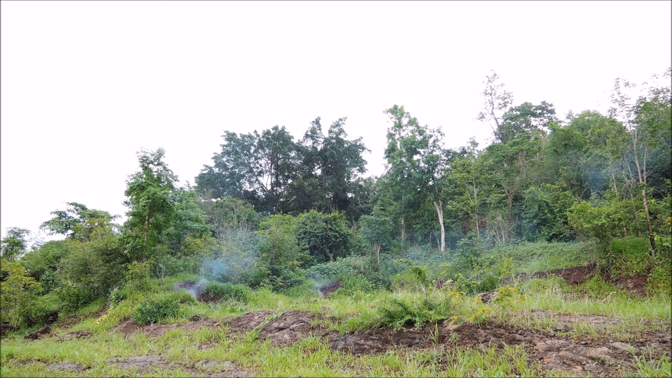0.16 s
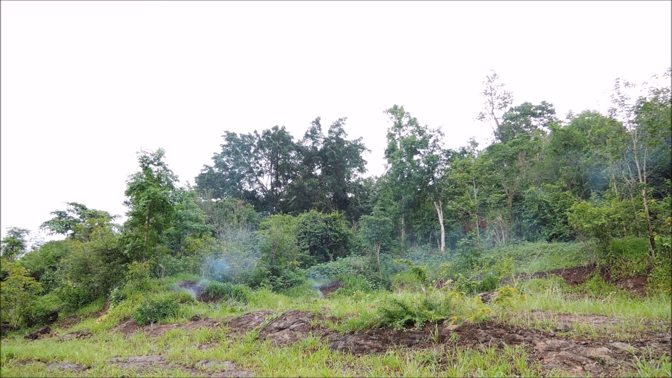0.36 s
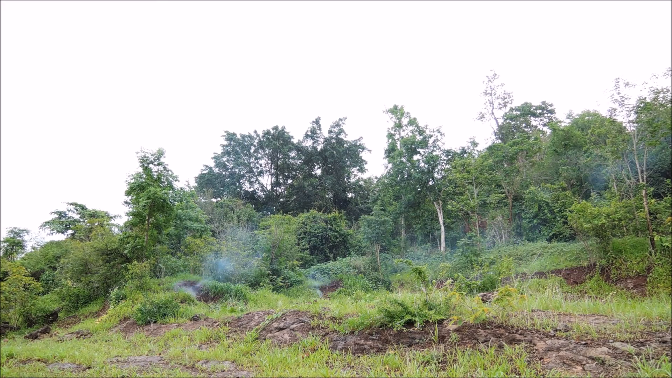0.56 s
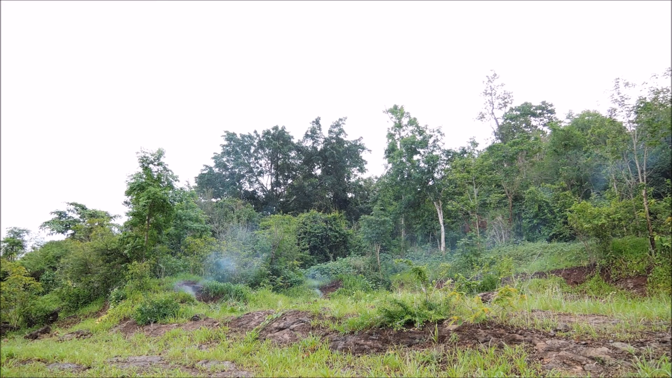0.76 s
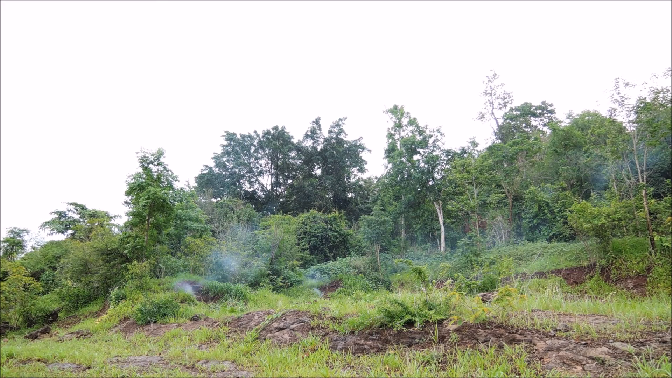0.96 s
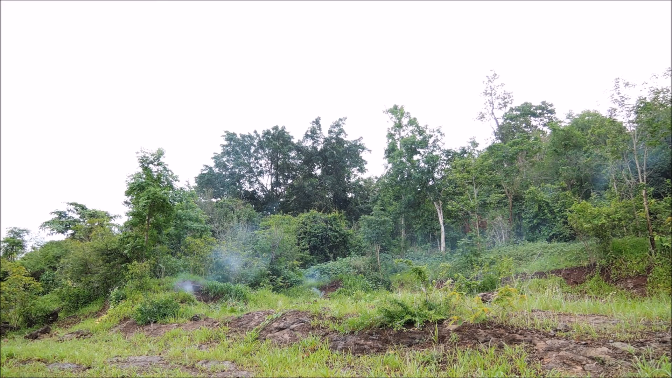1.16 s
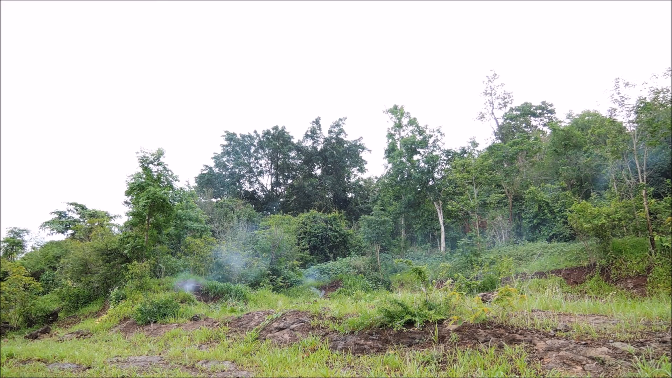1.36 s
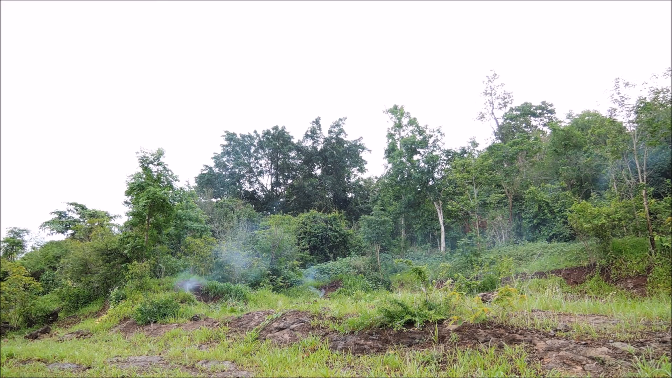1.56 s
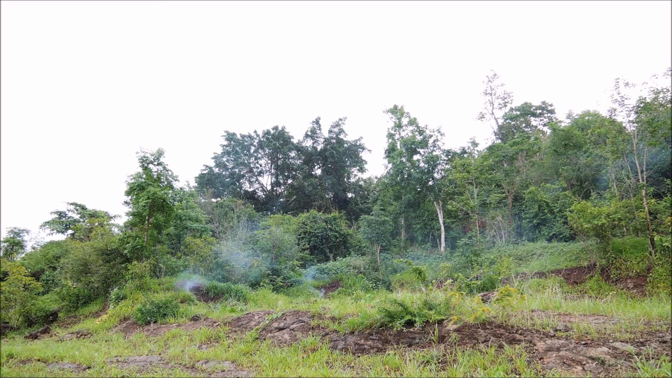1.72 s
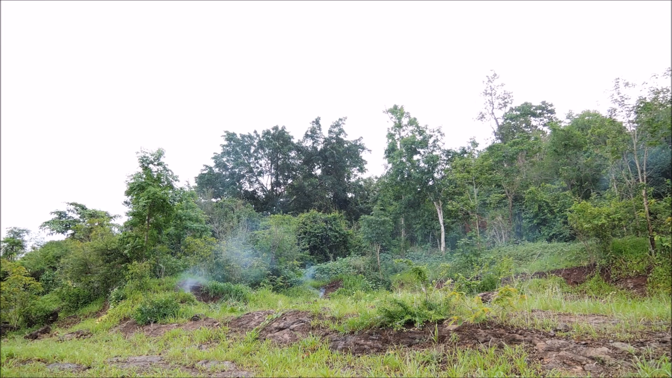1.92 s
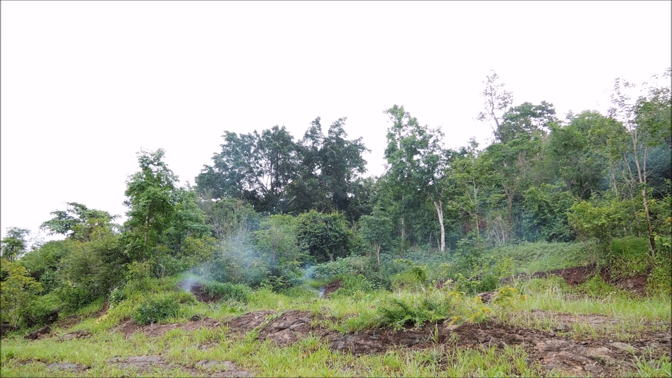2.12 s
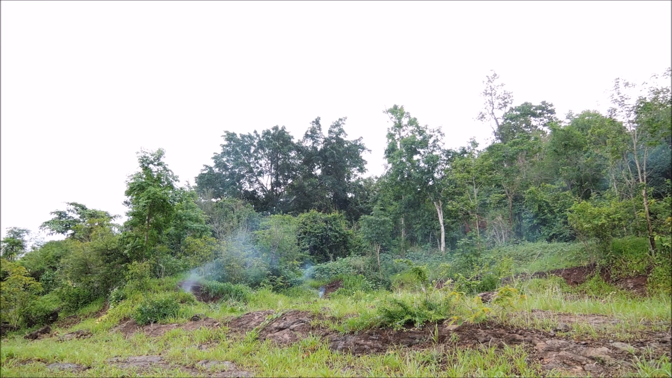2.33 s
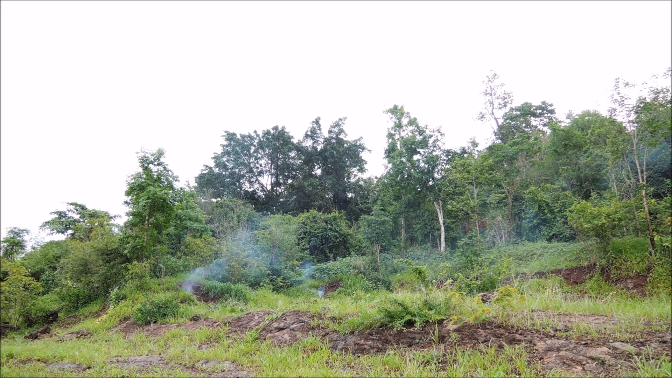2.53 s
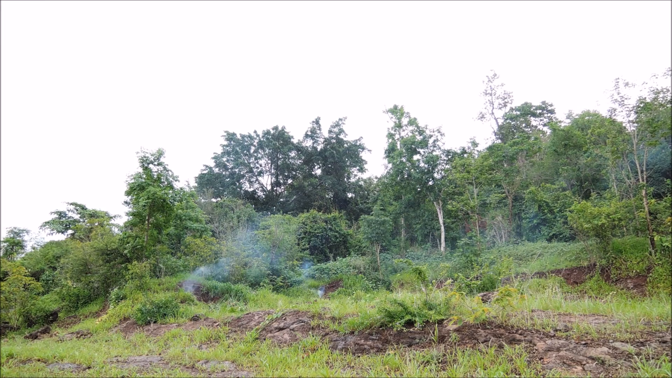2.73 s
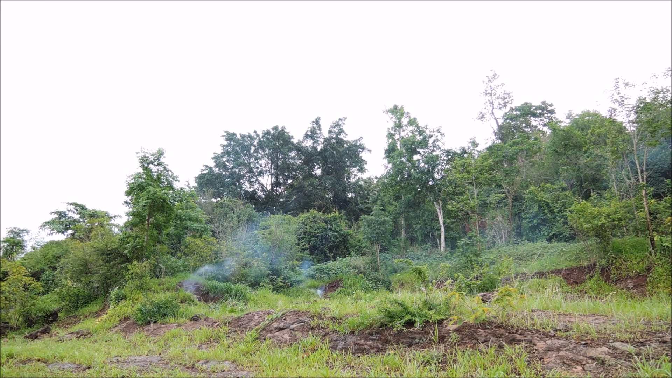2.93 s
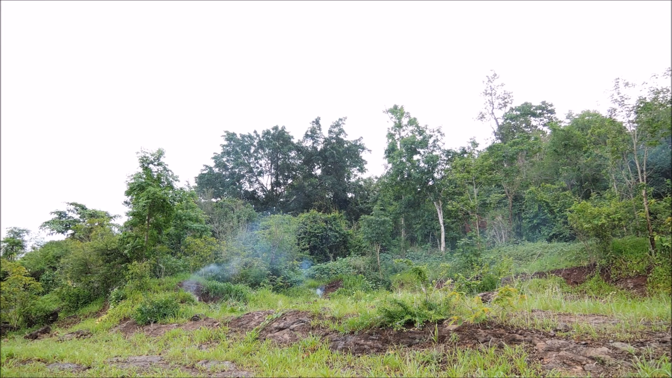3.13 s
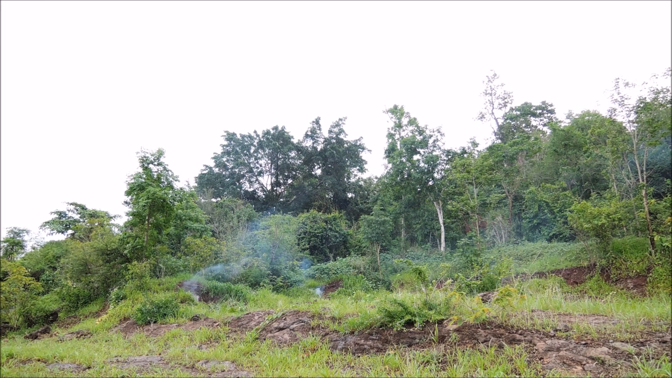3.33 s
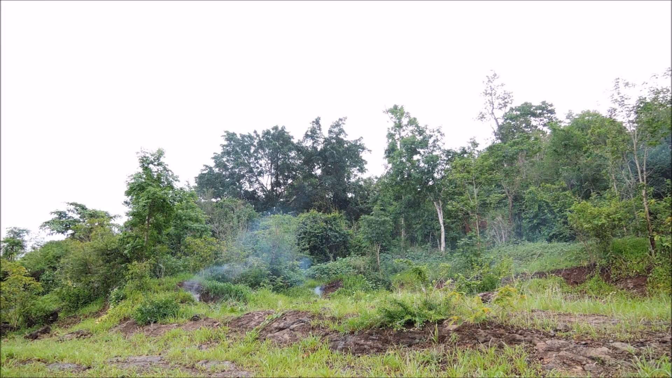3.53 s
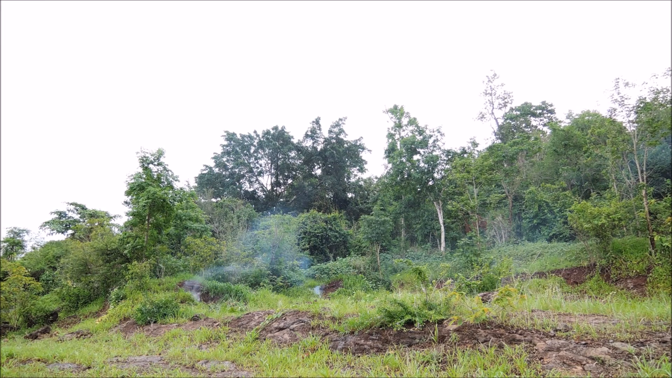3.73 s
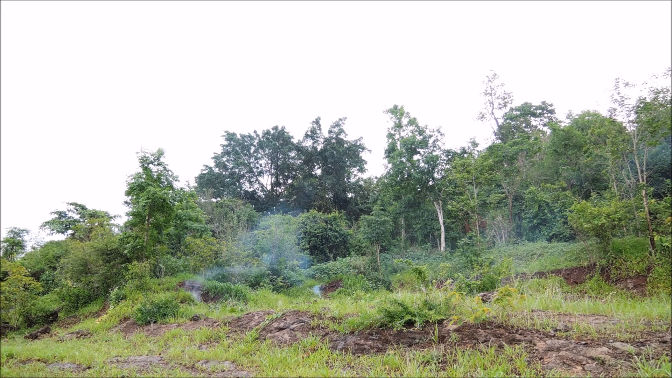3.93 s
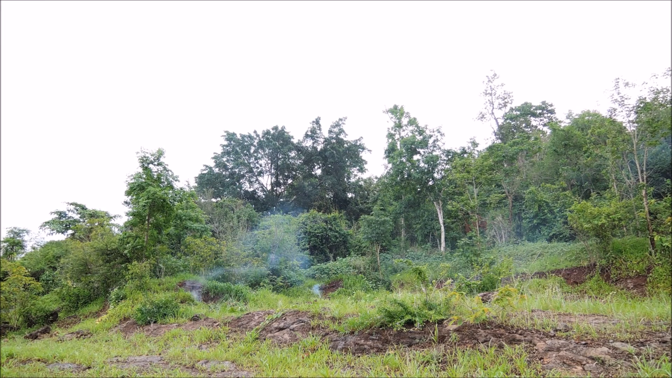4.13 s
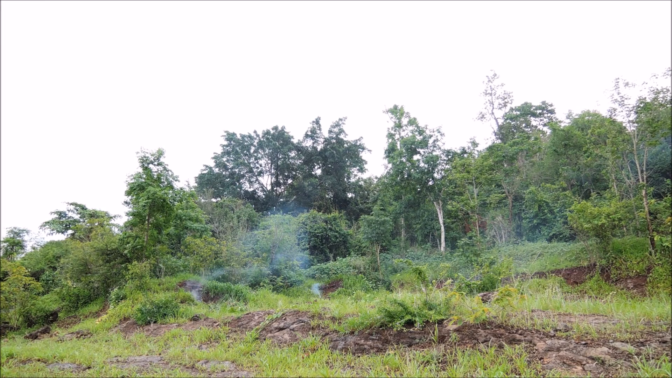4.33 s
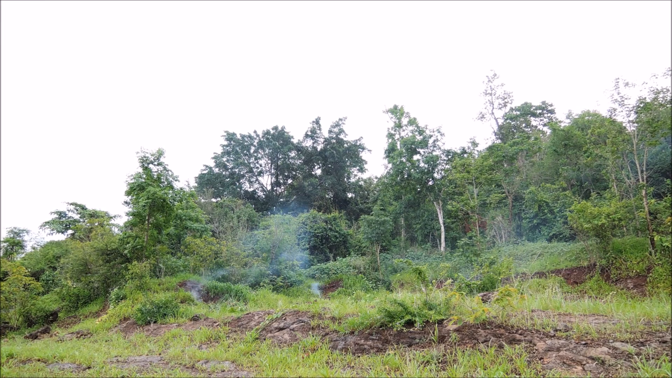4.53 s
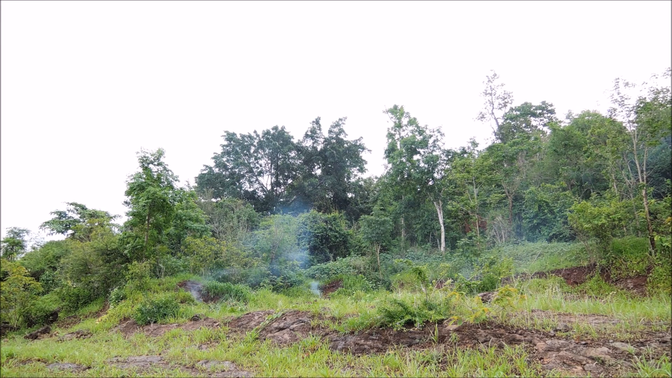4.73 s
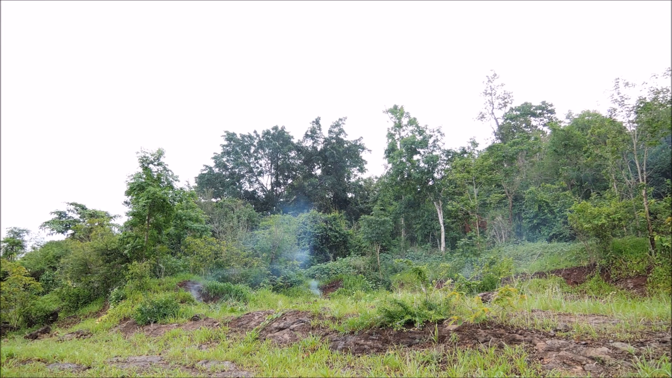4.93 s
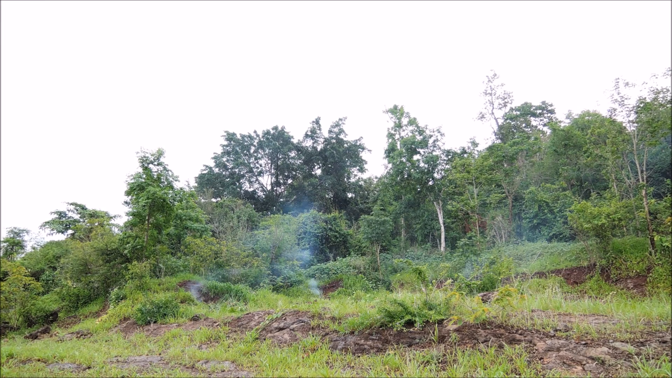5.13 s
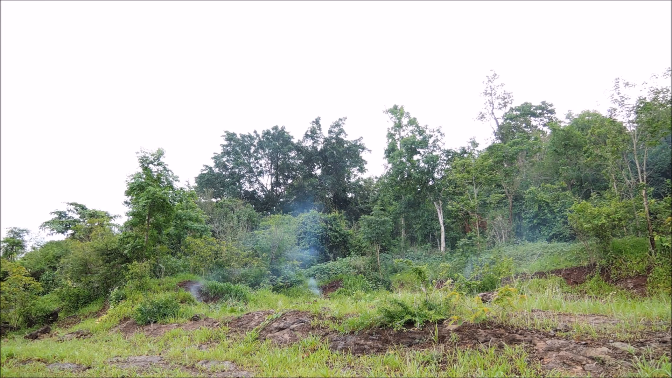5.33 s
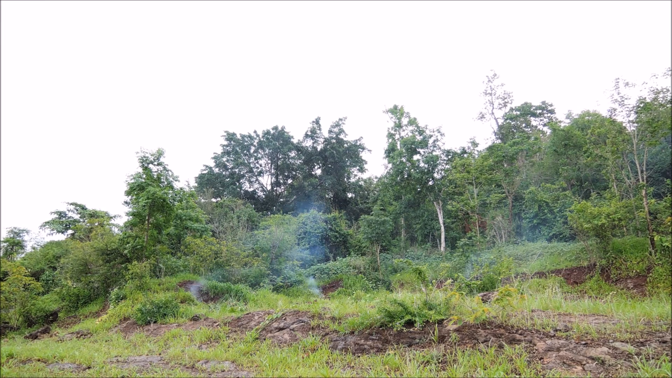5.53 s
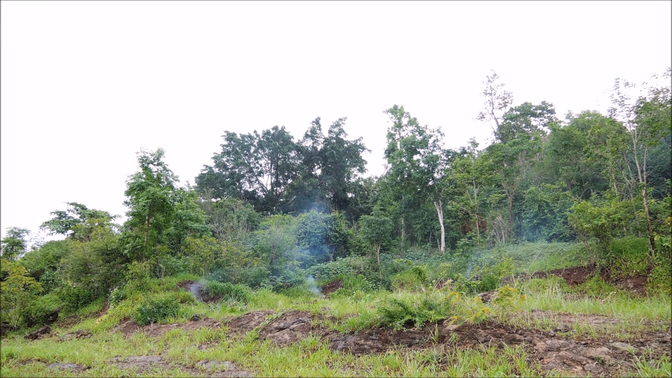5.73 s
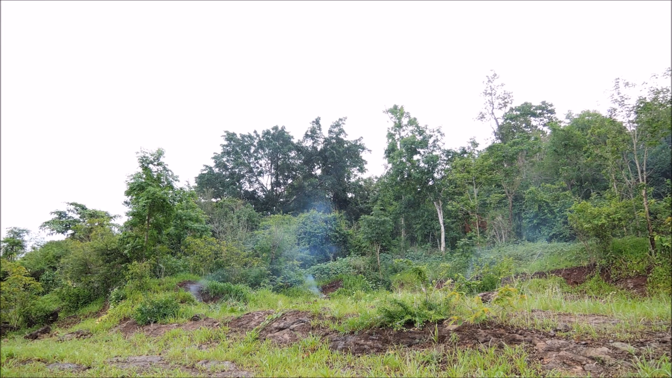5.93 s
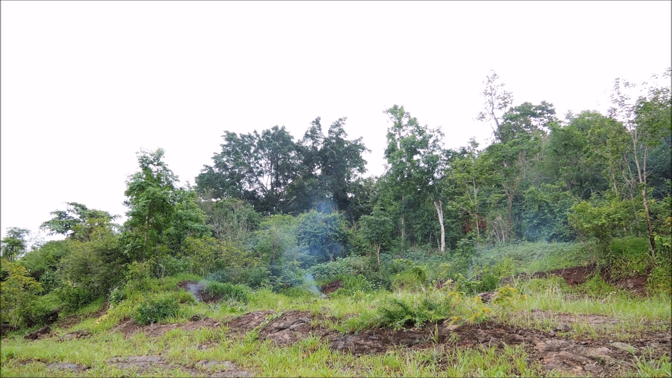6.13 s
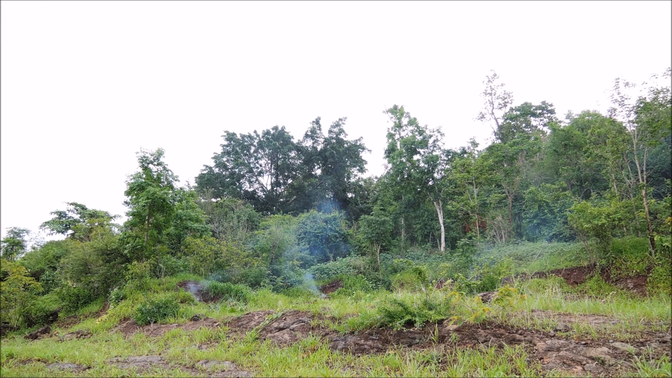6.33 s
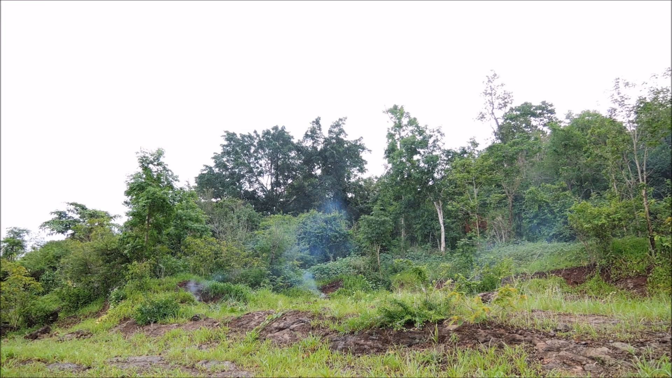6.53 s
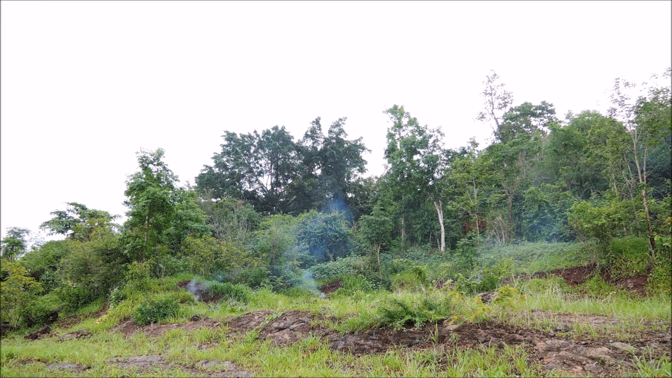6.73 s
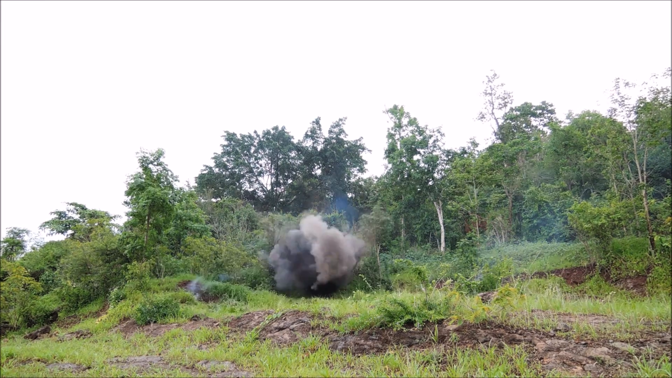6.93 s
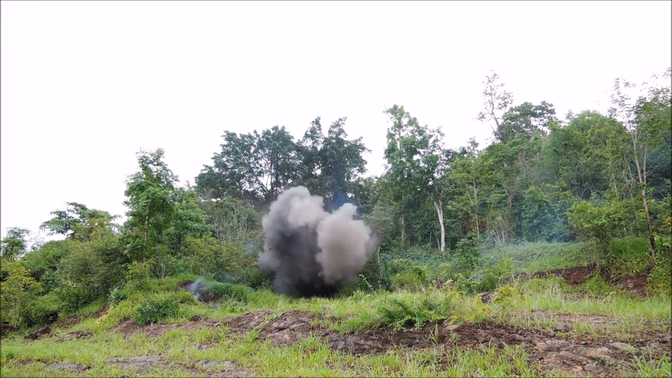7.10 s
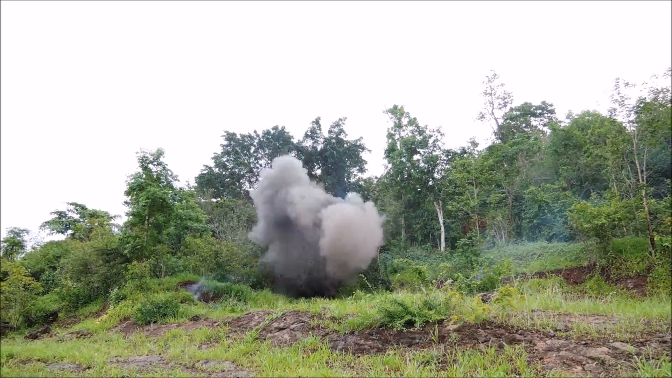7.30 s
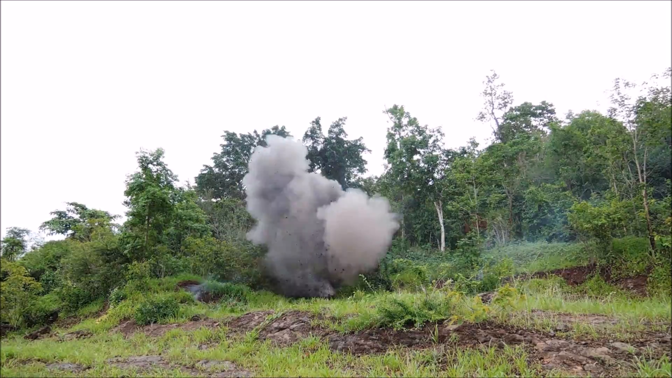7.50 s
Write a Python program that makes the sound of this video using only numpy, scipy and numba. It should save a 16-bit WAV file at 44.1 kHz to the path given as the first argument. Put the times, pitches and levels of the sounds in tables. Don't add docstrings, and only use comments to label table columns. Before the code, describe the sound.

Open scrubland, heard through a small stereo camera microphone. A light breeze flutters on the microphone while leaves hiss; a cicada swells in phrases, an insect ticks steadily, a cricket chirps and far birds whistle faintly. Near seven seconds a tiny tick and swelling low ground rumble lead instantly into a huge clipped explosion, followed by dense rough echoes and low surges, darkening until the cut.

```python
import sys
import numpy as np
from scipy import signal
from scipy.fft import rfft, irfft, next_fast_len
from scipy.io import wavfile
from scipy.ndimage import uniform_filter1d
from numba import njit

SR = 44100
rng = np.random.default_rng(int(sys.argv[2]) if len(sys.argv) > 2 else 0)


def convert_level_to_amplitude(level_db):
    exponent = np.asarray(level_db, float) / 20
    return 10 ** exponent


def generate_wav(sig):
    pcm = np.round(np.clip(np.atleast_2d(sig).T, -1, 1) * 32767).astype(np.int16)
    wavfile.write(sys.argv[1], SR, pcm)


N = 337806
SHOCK_S = 6.9256

# frequency in Hz, level in dB per Hz.
LEAF_COLOUR = [(88, -22), (150, -2.5), (231, -8), (431, -13), (702, -15), (805, -13.5), (998, -15),
               (1450, -19), (1660, -19.5), (5460, -25), (6390, -24), (7470, -28), (13400, -34.5),
               (15100, -42), (15700, -46), (15850, -70)]
LEAF_DB = -53.5
# frequency in Hz, side minus mid in dB.
AIR_WIDTH = [(60, -0.5), (110, -15.5), (200, -2.5), (380, -1), (700, -2.5), (1290, -2), (2380, -2),
             (4400, -2.5), (8120, -2), (15000, -3.5)]
# frequency in Hz, level in dB per Hz.
RUMBLE_COLOUR = [(7.1, -26), (12, 3), (22, 6), (53, -3), (134, -11), (220, -26.5), (290, -46), (480, -120)]
# time in seconds, level in dB.
BREEZE = [(0.0, -45), (1.0, -54), (2.0, -45), (2.65, -48), (3.3, -41.5), (3.8, -54), (4.3, -54), (4.7, -55),
          (5.2, -54), (5.6, -39), (6.2, -48), (6.9, -42.5)]
# centre in seconds, peak in dB, half length in seconds.
GUSTS = [(0.027, -32.5, 0.037), (0.16, -42, .04), (0.35, -42, 0.05), (0.503, -44, 0.032), (0.924, -44, .04),
         (1.132, -44, 0.036), (1.32, -33, .05), (1.55, -47, 0.033), (1.642, -31, 0.025), (1.82, -47, 0.054),
         (2.263, -43, 0.072), (2.446, -39, 0.033), (2.808, -45, 0.031), (3.027, -42, 0.019),
         (3.5, -45, 0.051), (3.728, -48, 0.044), (4.584, -51, .03), (5.694, -45, 0.018), (5.83, -54, 0.015),
         (5.965, -46, 0.052), (6.34, -41, 0.066), (6.444, -37, 0.021), (6.638, -49, .05)]
HUM_DB, HUM_FOLLOWS = -50.5, 0.099

# end of the last throb in seconds, top level in dB.
PHRASES = [
    (1.085, -64),
    (2.70, -66),
    (4.35, -65),
    (6.04, -65.5),
    (7.7, -57),
]
LINGER_S, LINGER_DB, LINGER_HZ = 0.31, -73.5, 6080
REST_S, REST_DB, REST_HZ = 0.62, -75.5, 6180
TOP_HZ, FALL_S = 6530, 0.063

# ticks so far, time in seconds.
TICK_CLOCK = [(0, 0.107), (6, 0.876), (12, 1.62), (17, 2.246), (22, 2.858), (31, 3.957), (38, 4.805),
              (47, 5.902), (55, 6.85)]
TICK_DB, TICK_SPREAD_DB = -58.5, 1.8
# start in seconds, length in seconds, pitch in Hz, level in dB.
BIRDS = [(2.77, .04, 6050, -59), (2.865, .03, 6050, -69), (2.915, .035, 5830, -61),
         (2.965, .055, 5870, -63), (3.07, .03, 5830, -68), (.3, .06, 2900, -68), (.36, 0.046, 2500, -67),
         (2.06, .05, 2500, -67), (2.82, 0.057, 2190, -64), (4.85, .05, 3000, -67), (4.98, .05, 2950, -68),
         (5.66, 0.033, 2780, -58), (5.758, 0.07, 2780, -67), (5.95, .1, 1200, -63), (6.04, 0.1, 1170, -63),
         (6.123, .08, 1070, -64), (6.18, .07, 986, -59), (6.261, 0.042, 1117, -59),
         (6.36, 0.058, 1155, -57), (6.54, 0.048, 1170, -57), (6.73, 0.073, 1148, -61)]

# last stroke in seconds, number of strokes, stroke spacing in ms, peak in dB,
# share heard through the brush from 0 to 1.
CHIRPS = [(1.695, 3, 36.0, -45, 0.073), (1.7316, 1, 36.0, -61, .7), (1.9178, 3, 35.9, -44, 0.079),
          (2.1405, 3, 35.8, -44.5, .12), (2.312, 3, 35.0, -57, 0.82), (2.538, 3, 35.5, -56, 0.72),
          (3.381, 4, 38.4, -54, 0.9), (3.573, 3, 37.0, -54.5, 0.81), (3.8371, 1, 36.0, -62, .15),
          (3.9985, 1, 36.0, -59, .15), (4.1116, 3, 36.5, -47, 0.079), (4.1423, 1, 36.0, -63, .7),
          (4.3692, 4, 35.8, -46.5, .12), (4.66, 3, 37.0, -65, .77), (5.132, 3, 37.6, -57, 0.74),
          (5.355, 3, 35.0, -56, .7), (5.3801, 1, 36.0, -68, .7), (5.5485, 3, 38.5, -57, 0.8),
          (6.6366, 1, 36.0, -67, .15), (6.7491, 3, 36.5, -48, 0.16), (6.9, 1, 36.0, -50, .25)]
# start in seconds, peak in dB, start pitch in Hz.
LEAD_INS = [(1.594, -57, 4750), (1.825, -60, 5000), (2.055, -54, 5060), (3.237, -62, 4750),
            (3.846, -59, 4780), (4.025, -59, 4600), (4.06, -57, 4800), (4.63, -63, 4900),
            (6.646, -60, 4750)]
STROKE_HZ, SWELL_DB = 5380, 1.7

# time in seconds, pitch in Hz, peak in dB.
GROUND = [
    (6.876, 210, -54),
    (6.882, 212, -24),
    (6.891, 191, -24),
    (6.896, 105, -16),
    (6.905, 88, -10),
    (6.914, 108, -11),
    (6.9195, 116, -4),
    (6.9225, 111, -22),
    (6.9245, 110, -26),
]

ECHO_EDGES_HZ = [20, 220, 550, 3500, 19000]
# offset in dB, share of the scatter strength followed from 0 to 2,
# loss on the way in dB per second.
ECHO_BANDS = [
    (-14, 0.27, 1.5),
    (-2.5, 1.07, 17),
    (1.5, 1.006, 2),
    (3.5, 0.98, 22),
]
# frequency in Hz, level in dB per Hz.
ECHO_COLOUR = [(15, -44), (25, -17), (78, 11), (185, -2), (242, -15), (293, -11), (326, -21), (405, -18),
               (451, -21.5), (659, -20), (1700, -21.5), (3920, -29.5), (10400, -34), (14000, -45),
               (16000, -67)]
# frequency in Hz, side minus mid in dB.
ECHO_WIDTH = [(60, -14), (110, -18), (200, -14), (380, -12), (700, -10), (1290, -10), (2380, -9),
              (4400, -6), (8120, -2), (15000, 1)]
# time in seconds, level in dB.
SCATTER = [(6.93, -10), (6.956, -12.5), (6.985, -18.5), (7.234, -21), (7.243, -28), (7.33, -30.5),
           (7.42, -33.5), (7.52, -33.5), (7.66, -33)]
# time in seconds, corner in Hz.
ECHO_CORNER = [(6.93, 13500), (7.0, 13000), (7.23, 10700), (7.4, 9000), (7.66, 9400)]
# time in seconds, peak in dB, front length in ms.
FRONTS = [
    (6.9288, 2.5, 16),
    (7.202, -9, 8.3),
    (7.229, -1.5, 14.4),
]
# start in seconds, length in seconds, peak in dB, centre in Hz.
RETURNS = [(6.94, 0.027, -24, 806), (6.96, 0.13, -27.5, 810), (6.963, .06, -17, 340),
           (7.06, 0.21, -21.5, 776), (7.084, 0.067, -22.5, 350), (6.997, 0.079, -19.5, 240),
           (7.134, 0.093, -24.5, 209), (7.246, 0.091, -28.5, 746), (7.455, 0.102, -32, 605),
           (7.473, .1, -49, 1400), (7.395, 0.069, -31.5, 770), (7.45, 0.092, -34, 355),
           (7.442, 0.22, -32.5, 830), (7.493, 0.054, -45, 2500), (7.57, 0.052, -46, 7340),
           (7.615, 0.071, -42, 357)]
RETURN_WIDTH, RETURN_EDGE = 0.65, 0.53
# start in seconds, length in seconds, pitch in Hz, peak in dB.
SURGES = [(6.959, 0.093, 188, -18), (6.984, 0.089, 77.4, -8.5), (7.056, 0.075, 109.6, -8.5),
          (7.101, 0.06, 76.4, -8.5), (7.108, 0.07, 160, -17.5), (7.16, 0.079, 104, -13),
          (7.212, 0.069, 67, -15.5), (7.288, 0.063, 60, -17.5), (7.365, 0.107, 101, -17.5),
          (7.407, 0.068, 45.5, -16), (7.51, 0.058, 66, -17.5), (7.592, 0.073, 91.4, -16.5)]

# start in seconds, highest frequency in Hz.
TOP_STEPS = [(6.962, 14900), (7.02, 15700), (7.105, 14300), (7.16, 13400), (7.2, 12900), (7.33, 12600)]
CEILING, SQUEEZE, SQUEEZE_S = 0.70, 0.32, 0.04


def unit(x):
    return x / np.sqrt(np.mean(x ** 2))


def curves(table):
    s, *columns = np.transpose(table)
    return [np.interp(np.arange(N) / SR, s, c) for c in columns]


def shape(x, points, lo_hz=0., hi_hz=30000.):
    size = next_fast_len(N, True)
    hz = np.arange(size // 2 + 1) * SR / size + 1e-3
    point_hz, point_db = np.transpose(points)
    db = np.interp(np.log(hz), np.log(point_hz), point_db)
    edge = 1 / np.sqrt((1 + (lo_hz / hz) ** 8) * (1 + (hz / hi_hz) ** 8))
    return irfft(rfft(x, size) * convert_level_to_amplitude(db) * edge, size)[..., :N]


def pair(mid, side, side_db):
    side = shape(side, side_db)
    return np.array([mid + side, mid - side])


def walk(rate):
    hold = int(SR / rate)
    steps = np.repeat(rng.standard_normal(N // hold + 1), hold)
    return 1.68 * uniform_filter1d(uniform_filter1d(steps, hold), hold)[:N]


def add(out, s, sound):
    i = int(s * SR)
    out[i:i + len(sound)] += sound[:N - i]


def swell(u, edge):
    return np.sin(np.pi / 2 * np.clip(2 * np.minimum(u, 1 - u) / edge, 0, 1)) ** 2


def glide(hz0, hz1, length, edge=0.5):
    count = int(length * SR)
    u = np.arange(count) / count
    return swell(u, edge) * np.sin(2 * np.pi * np.cumsum(hz0 + (hz1 - hz0) * u) / SR)


@njit
def svf(x, hz, width):
    y, b, l = np.empty(len(x)), 0., 0.
    for i in range(len(x)):
        g, k = np.tan(np.pi * hz[i] / SR), width / hz[i]
        v = (b + g * (x[i] - l)) / (1 + g * (g + k))
        b, l, y[i] = 2 * v - b, l + 2 * g * v, k * v
    return y


def resonate(x, hz, width, width2=None):
    return svf(svf(x, hz, width), hz, width if width2 is None else width2)


def brush(x, t60):
    t = np.arange(int(0.2 * SR)) / SR
    tails = rng.standard_normal((2, len(t))) * convert_level_to_amplitude(-60 * t / t60)
    tails[1] = 0.57 * tails[0] + 1.0 * tails[1]
    return np.array([signal.fftconvolve(x, h / np.sqrt(np.sum(h ** 2)))[:len(x)] for h in tails])


def air():
    t = np.arange(N) / SR
    push = convert_level_to_amplitude(curves(BREEZE)[0])
    for s, db, half in GUSTS:
        push = push + convert_level_to_amplitude(db) * np.exp(-((t - s) / half) ** 2)
    noise = rng.standard_normal((6, N))
    hiss = pair(shape(noise[0], LEAF_COLOUR, 135.0), shape(noise[1], LEAF_COLOUR, 150.0), AIR_WIDTH)
    rumble = pair(shape(noise[2], RUMBLE_COLOUR, 10.5, 50.0), shape(noise[3], RUMBLE_COLOUR, 10., 62.0), AIR_WIDTH)
    hum = pair(shape(noise[4], RUMBLE_COLOUR, 46.0, 171.0), shape(noise[5], RUMBLE_COLOUR, 87.0, 190.), AIR_WIDTH)
    hiss = unit(hiss) * convert_level_to_amplitude(LEAF_DB + 0.2 * walk(4.47))
    hum = unit(hum) * unit(push ** HUM_FOLLOWS) * convert_level_to_amplitude(HUM_DB)
    return hiss + unit(rumble) * push + hum


def cicada():
    t = np.arange(N) / SR
    ends, tops = np.transpose(PHRASES)
    last = np.append(ends[0] - np.mean(np.diff(ends)), ends[:-1])
    knots = np.ravel([last, last + LINGER_S, last + REST_S, ends - FALL_S], "F")
    db = np.interp(t, knots, np.ravel([(LINGER_DB, LINGER_DB, REST_DB, top) for top in tops]))
    hz = np.interp(t, knots, np.tile([LINGER_HZ, LINGER_HZ, REST_HZ, TOP_HZ], len(ends)))
    left = ends[np.searchsorted(ends, t)] - t
    phase = -14.0 * left % 1
    effort = np.clip((db + 70) / 5, 0, 1)
    centre = hz + effort * (80 + 900 * (0.5 - phase))
    buzz = [resonate(n, centre, 650.) for n in rng.standard_normal((2, N))]
    throb = 1 + effort * (0.45 - 1.05 * np.cos(np.pi * phase) ** 2)
    return unit(pair(buzz[0], buzz[1], [(100, -8), (9000, -9.5)])) * convert_level_to_amplitude(db + 1.0) * throb


def through_brush(voice):
    return 0.8 * voice + convert_level_to_amplitude(-7) * brush(voice, 0.12)


def ticking_insect():
    out = np.zeros(N)
    times = np.interp(np.arange(TICK_CLOCK[-1][0] + 1), *np.transpose(TICK_CLOCK))
    for s, chance in zip(times, rng.standard_normal(len(times))):
        add(out, s - 0.005, convert_level_to_amplitude(TICK_DB + TICK_SPREAD_DB * chance) * glide(6500, 6080, 0.0092))
    return through_brush(out)


def far_birds():
    out = np.zeros(N)
    for s, length, hz, db in BIRDS:
        add(out, s, convert_level_to_amplitude(db - 0.5) * glide(hz + 25, hz - 35, length * 1.3, edge=0.8))
    return through_brush(out)


def cricket():
    near, far = np.zeros(N), np.zeros((2, N))
    for last, strokes, ms, db, wet in CHIRPS:
        for k in range(round(strokes)):
            s = last - k * ms / 1000
            stroke_db = db - 1.5 - SWELL_DB * k * (1 - 0.5 * wet)
            top = STROKE_HZ * (1 + 0.012 * rng.standard_normal())
            stroke = convert_level_to_amplitude(stroke_db) * glide(top, STROKE_HZ - 1400, 0.0235, edge=0.56)
            add(near, s, np.clip(1 - 1.3 * wet, 0, 1) * stroke)
            add(near, s + 0.018, convert_level_to_amplitude(-17) * stroke)
            padded = np.sqrt(np.clip(wet, 0, 1)) * np.pad(stroke, (0, int(0.2 * SR)))
            for port, tail in zip(far, convert_level_to_amplitude(5) * brush(padded, 0.3)):
                add(port, s, tail + convert_level_to_amplitude(3.5) * padded)
    for s, db, hz in LEAD_INS:
        add(near, s, convert_level_to_amplitude(db) * glide(hz, hz - 620, 0.0156, edge=0.5))
    centre = np.full(N, 4900.)
    return near + np.array([resonate(port, centre, 1000.) for port in far])


def twig():
    out = np.zeros(N)
    add(out, 6.861, convert_level_to_amplitude(-48) * glide(11600, 10800, 0.0012))
    return out


def ground_wave():
    hz, db = curves(GROUND)
    on = np.arange(int(GROUND[0][0] * SR), int(SHOCK_S * SR))
    out = np.zeros(N)
    shudder = convert_level_to_amplitude(-24) * unit(resonate(rng.standard_normal(len(on)), 2.2 * hz[on], 150.))
    wobble = np.sin(2 * np.pi * np.cumsum(hz[on]) / SR + 0.3)
    out[on] = uniform_filter1d(convert_level_to_amplitude(db), size=90)[on] * (wobble + shudder)
    return out


def scattered_shock(since):
    echoes = rng.standard_normal((2, N)) * convert_level_to_amplitude(2.28 * rng.exponential(size=(2, N)))
    echoes = pair(echoes[0], echoes[1], ECHO_WIDTH)
    out = 0
    for lo, hi, (db, share, loss_db) in zip(ECHO_EDGES_HZ, ECHO_EDGES_HZ[1:], ECHO_BANDS):
        db = db + share * curves(SCATTER)[0] - loss_db * np.maximum(since, 0)
        band = shape(echoes, ECHO_COLOUR, lo, hi)
        out = out + band / np.std(band.mean(axis=0)) * convert_level_to_amplitude(db + 0.73 * walk(90))
    corner = curves(ECHO_CORNER)[0]
    return np.array([e - svf(e, 1.5 * corner, 17000.0) for e in out])


def pressure_fronts():
    out = np.zeros(N)
    for s, db, ms in FRONTS:
        u = np.arange(int(3 * ms * SR / 1000)) / (ms * SR / 1000)
        push = (1 - np.exp(-u / 0.09)) * np.exp(-u / 0.5)
        add(out, s - 0.002, 1.6 * convert_level_to_amplitude(db) * push * np.cos(2 * np.pi * 0.8 * u))
    return out


def blast():
    since = np.arange(N) / SR - SHOCK_S
    out = scattered_shock(since)
    hollow = unit(resonate(rng.standard_normal(N), np.full(N, 410.), 57.0))
    out = out + convert_level_to_amplitude(np.array([[-17], [-15.5]])) * hollow * np.exp(-((since - 0.04) / 0.038) ** 2)
    capsule = unit(svf(rng.standard_normal(N), np.full(N, 10600.), 2200.0))
    direct = 1 + convert_level_to_amplitude(11) * np.exp(-np.abs(since) / 0.0035)
    out = out * direct + convert_level_to_amplitude(3) * capsule * np.exp(-np.abs(since) / 0.0073)
    return out * (since > 0) + pressure_fronts()


def slope():
    noise = rng.standard_normal((2, N))
    out = np.zeros((2, N))
    for s, length, db, hz in RETURNS:
        on = slice(int(s * SR), min(int((s + length) * SR), N))
        u = (np.arange(N)[on] / SR - s) / length
        centre, width = np.full(len(u), 1. * hz), RETURN_WIDTH * hz
        for port, n in zip(out, noise):
            port[on] += convert_level_to_amplitude(db) * swell(u, RETURN_EDGE) * unit(resonate(n[on], centre, width, 1.54 * width))
    return pair(out[0], out[1], ECHO_WIDTH) * convert_level_to_amplitude(1.2 * walk(60))


def surges():
    out = np.zeros(N)
    for s, length, hz, db in SURGES:
        add(out, s, convert_level_to_amplitude(db) * glide(1.04 * hz, 0.96 * hz, length))
    return out


def scene():
    before = air() + cicada() + ticking_insect() + far_birds() + cricket()
    return before + twig() + ground_wave() + blast() + slope() + surges()


def top_cut(x):
    return signal.sosfilt(signal.butter(12, 16250, fs=SR, output="sos"), x)


def record(dry):
    since = np.maximum(np.arange(N) / SR - SHOCK_S, 0)
    top = CEILING + SQUEEZE * (np.exp(-since / SQUEEZE_S) + (since > 0.29))
    flat = dry / (1 + np.abs(dry / top) ** 7) ** (1 / 7)
    out, start = flat.copy(), int(6.9 * SR)
    t = np.arange(start, N) / SR
    for s, hz in TOP_STEPS:
        lowpass = signal.ellip(10, 0.1, 50, hz, fs=SR, output="sos")
        dull = signal.sosfiltfilt(lowpass, flat[:, start:])
        share = np.clip((t - s) / 0.006, 0, 1)
        out[:, start:] = (1 - share) * out[:, start:] + share * dull
    return top_cut(out)


dry = scene()
out = record(dry)
generate_wav(out)
```